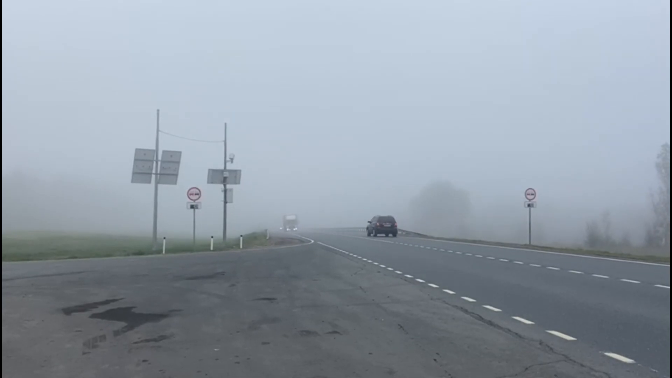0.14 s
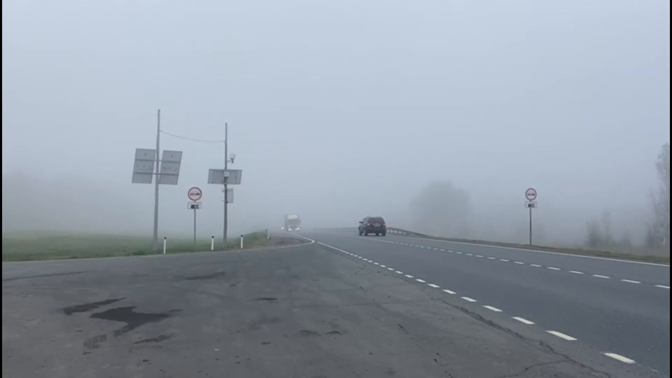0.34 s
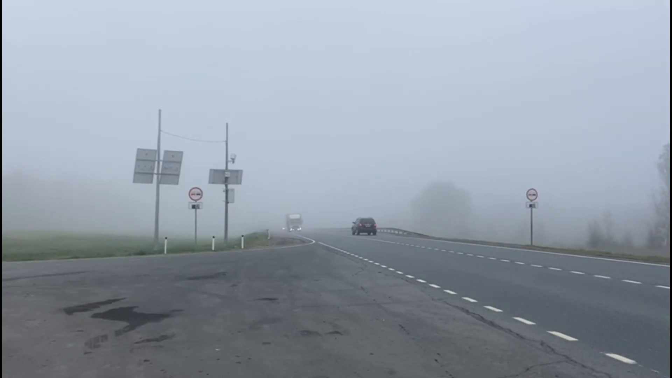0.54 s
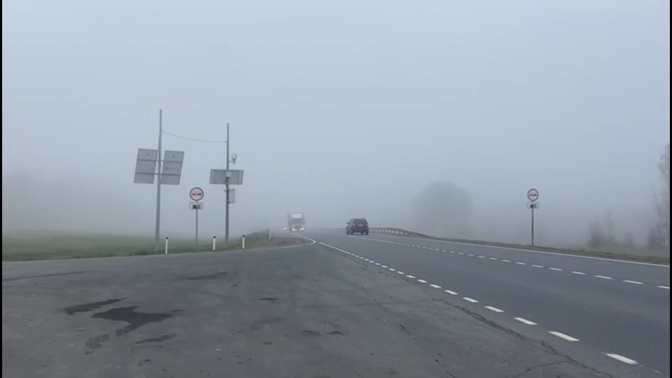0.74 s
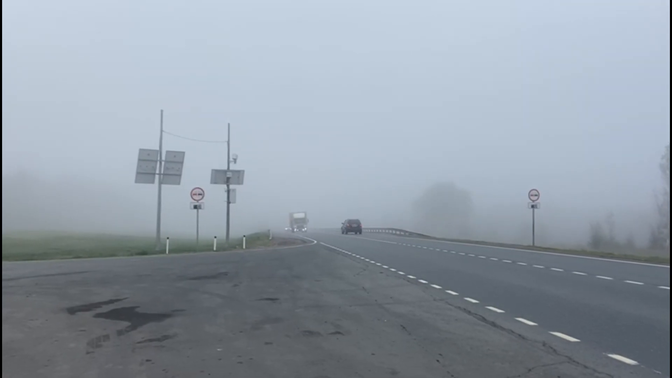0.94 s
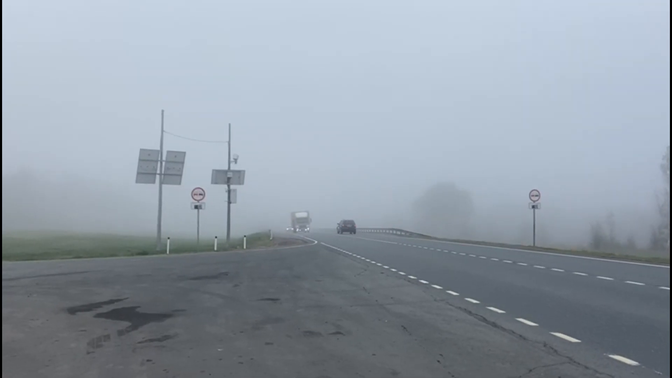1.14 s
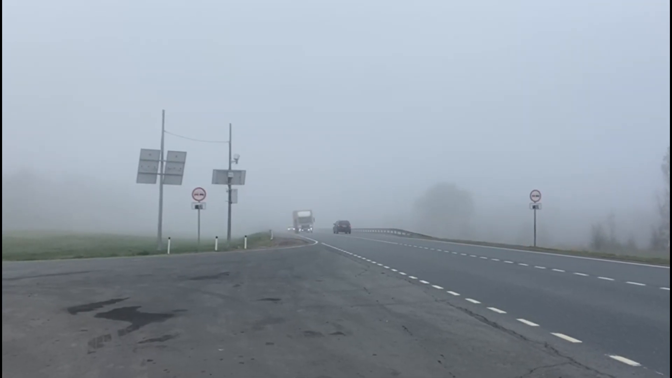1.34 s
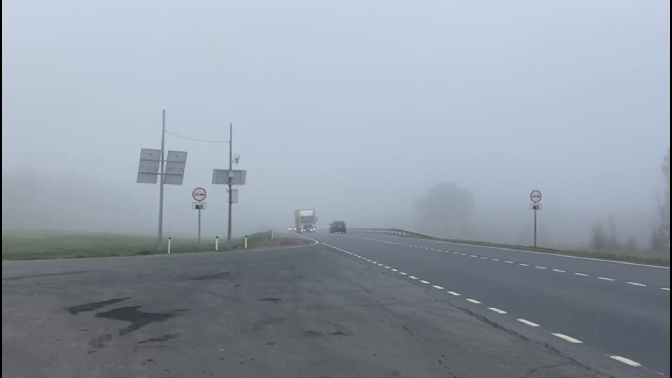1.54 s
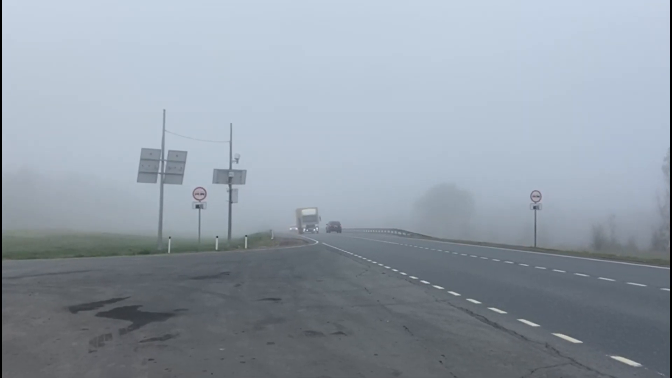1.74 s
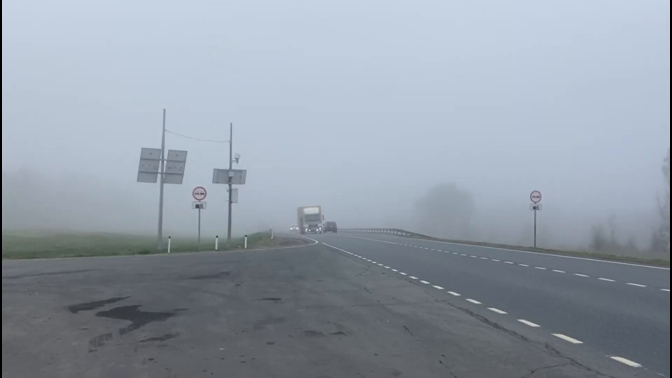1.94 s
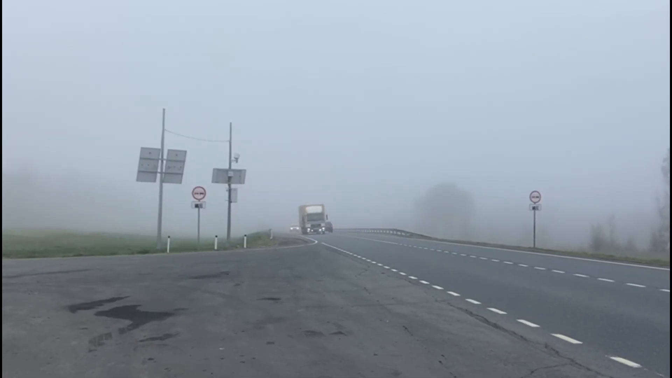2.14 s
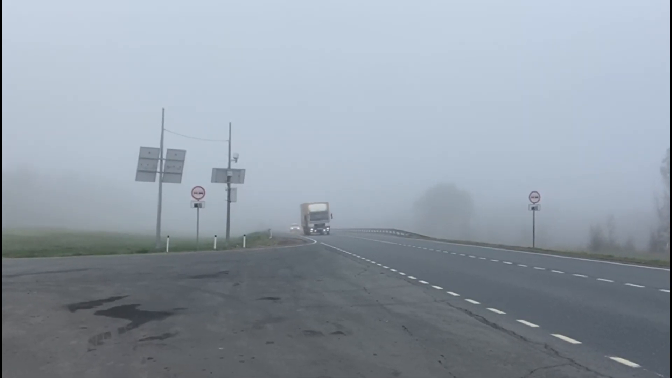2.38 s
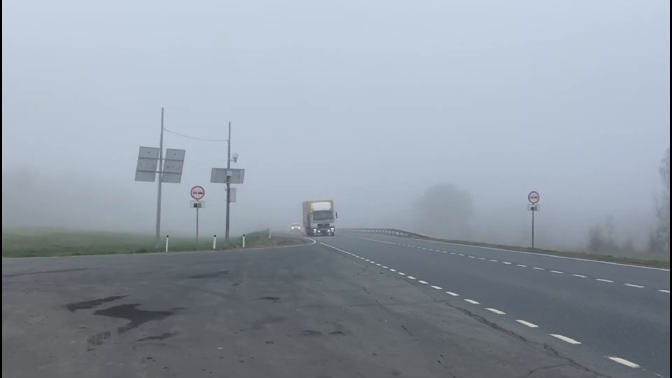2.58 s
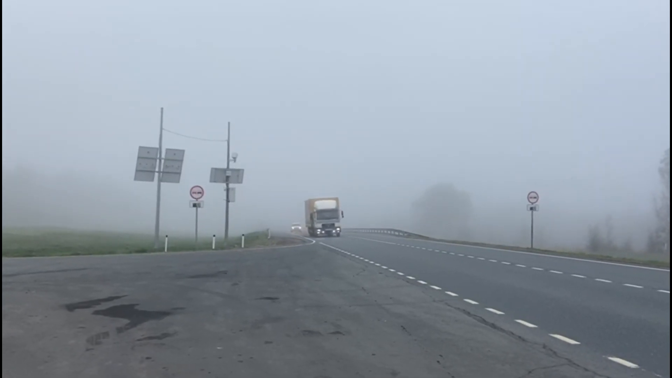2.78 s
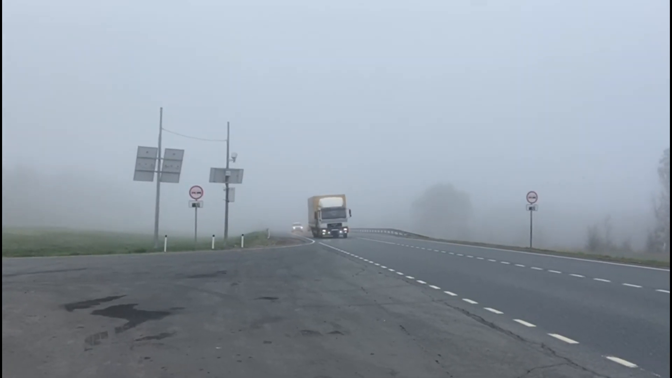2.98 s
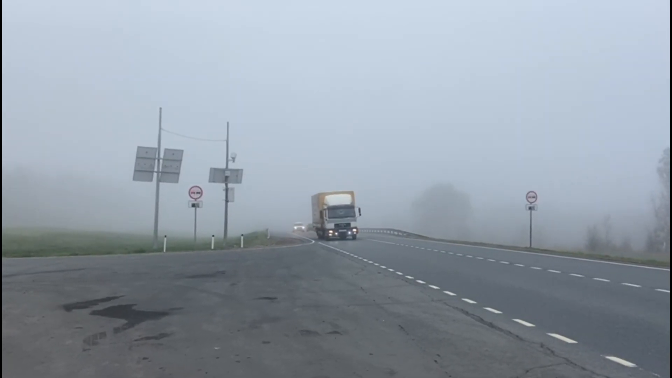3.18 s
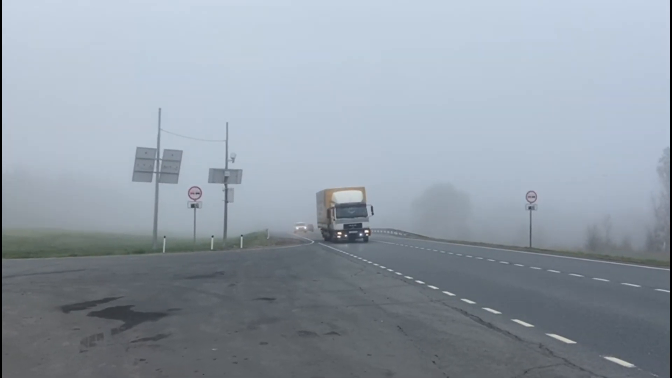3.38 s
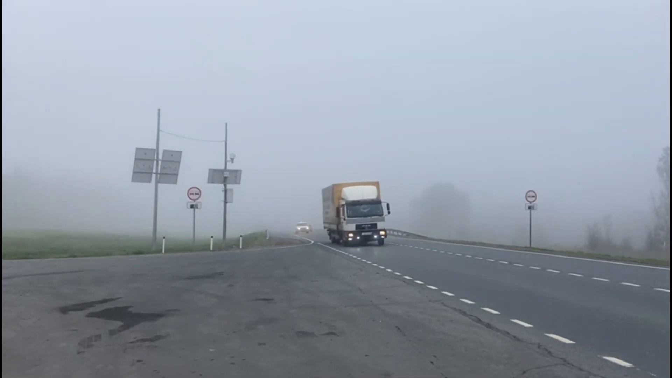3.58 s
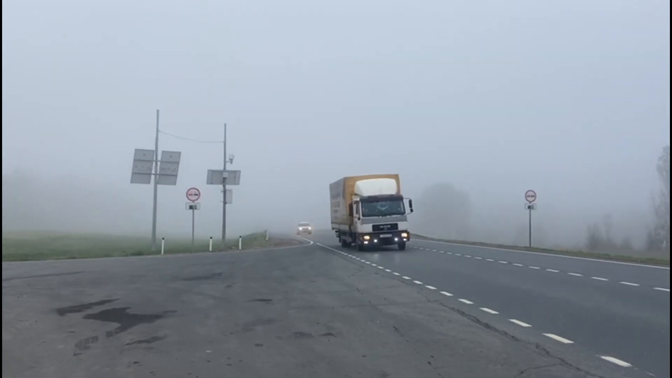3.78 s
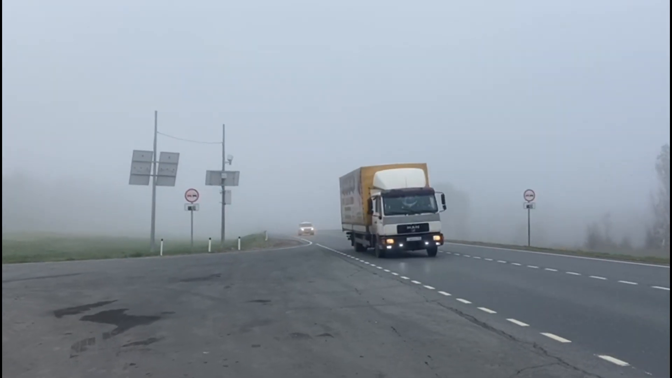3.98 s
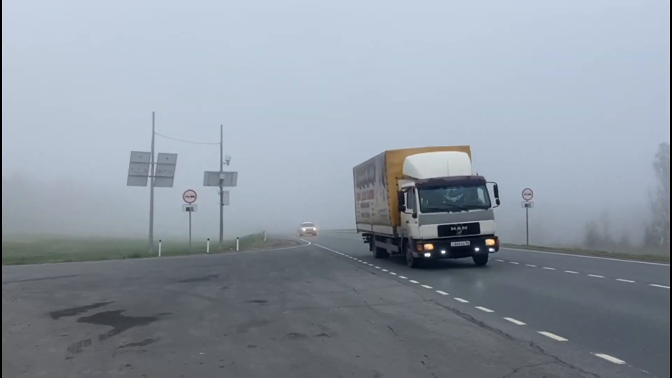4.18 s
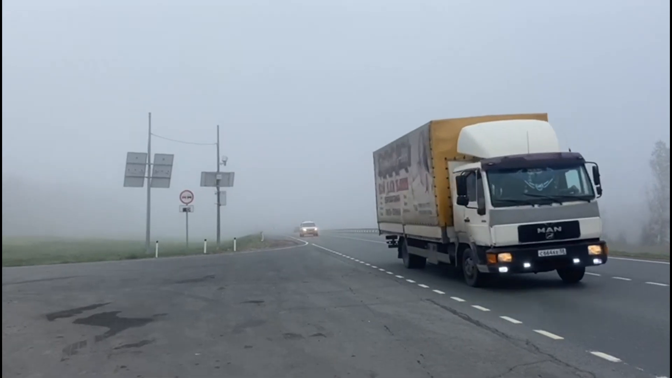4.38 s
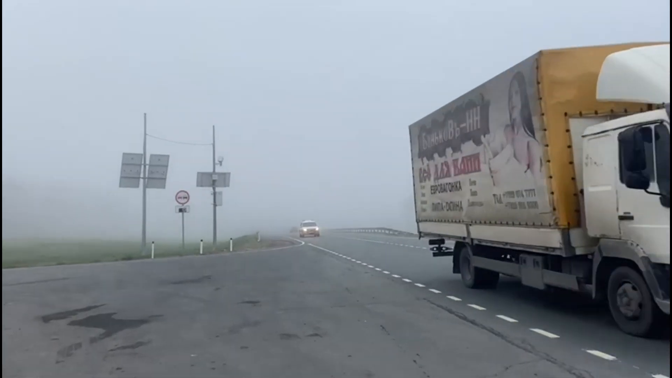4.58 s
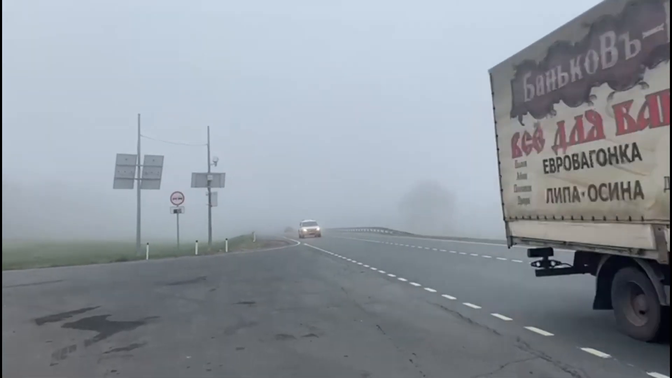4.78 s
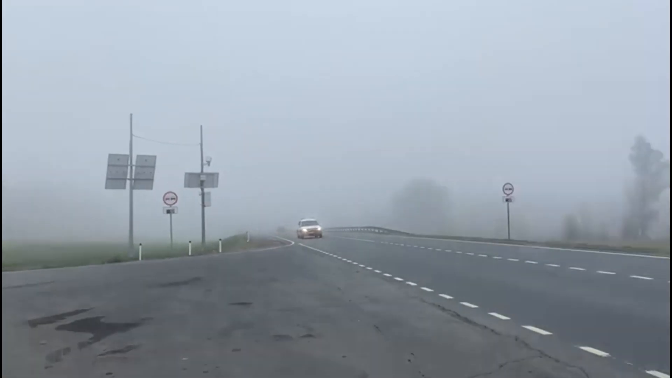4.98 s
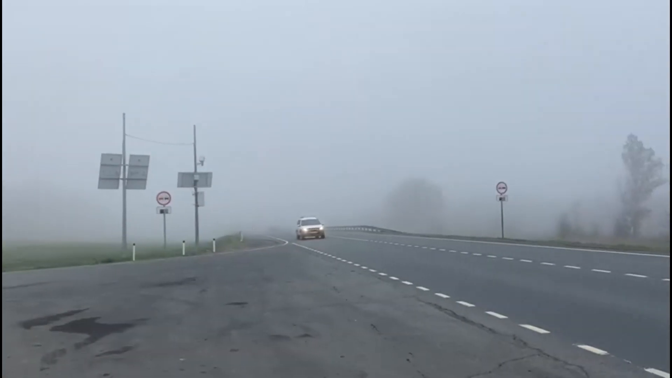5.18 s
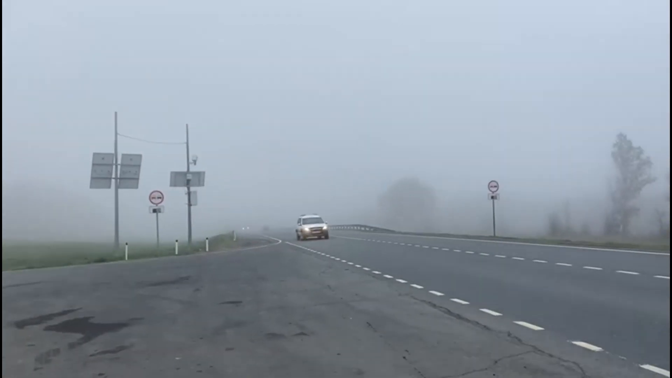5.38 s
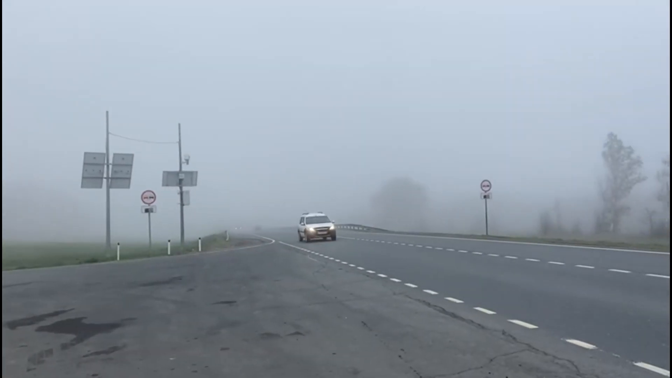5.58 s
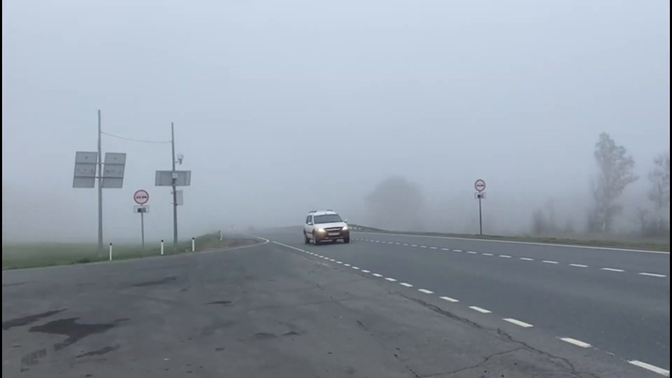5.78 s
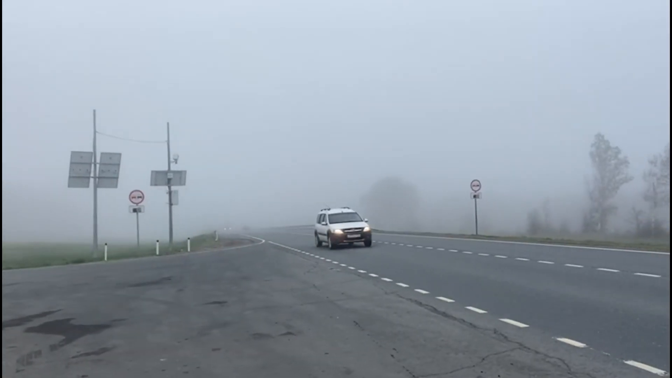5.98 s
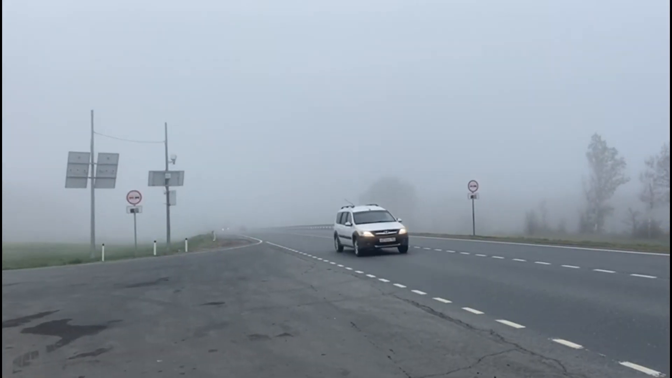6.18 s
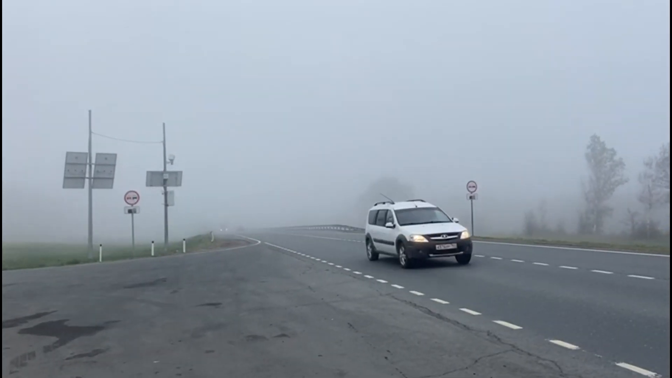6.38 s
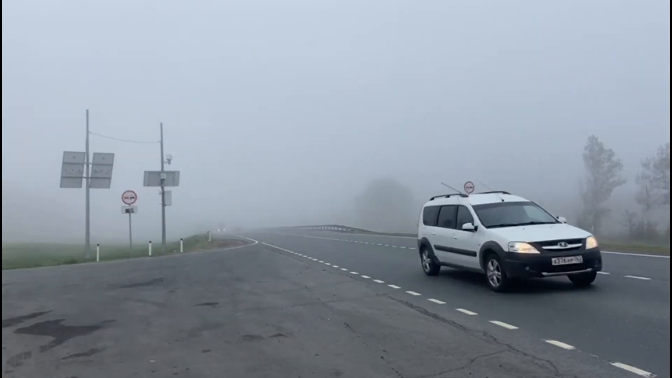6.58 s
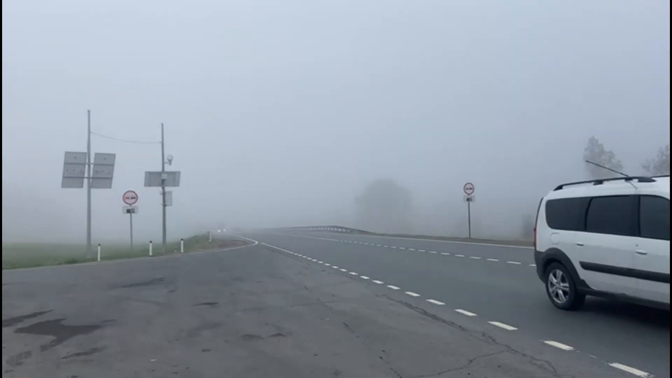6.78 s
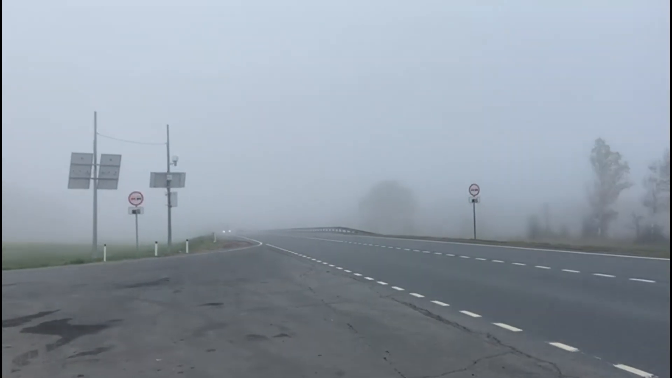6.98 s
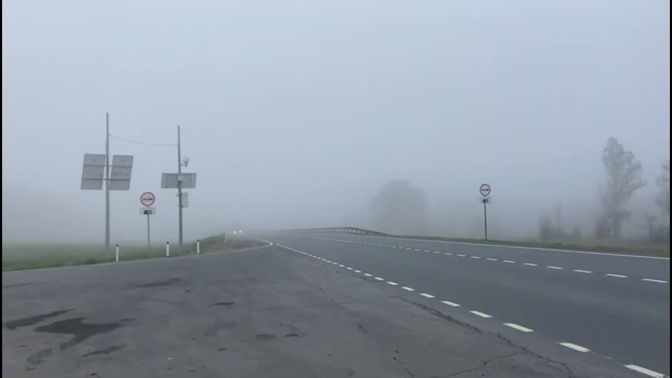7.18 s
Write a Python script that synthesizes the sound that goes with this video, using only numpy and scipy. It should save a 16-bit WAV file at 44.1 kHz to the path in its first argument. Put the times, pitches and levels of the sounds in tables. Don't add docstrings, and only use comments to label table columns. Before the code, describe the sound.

Close to a country highway outdoors, the tyre hiss of a departing car dwindles. A diesel truck approaches from ahead, its roar and low rumble swelling to a loud rush as it passes, exhaust humming on a deep falling note. The noise drops, then a second car swells and whooshes by. Small gusts thump softly on the handheld stereo phone microphones.

```python
import sys
import numpy as np
from scipy import signal
from scipy.fft import rfft, irfft
from scipy.io import wavfile
from scipy.ndimage import uniform_filter1d

SR = 44100
rng = np.random.default_rng(int(sys.argv[2]) if len(sys.argv) > 2 else 0)


def how_loud(loudness_db):
    steps = np.asarray(loudness_db, float) / 20
    return 10 ** steps


def pcm_store(signal):
    levels = np.round(np.clip(np.atleast_2d(signal), -1, 1) * 32767)
    wavfile.write(sys.argv[1], SR, levels.astype(np.int16).T)


N = 318843
FRAME = 1024
SPEED_M_S, LANE_M = 22.22, 5.44
ABREAST_S, PAST_S, TURN_S = -.2, 0.16, 0.038
CAR_FROM_S = 5.3
FAR_ROAD_DB = (-47.5, -42, -63, -64.5, -42.5, -37)


def curve(table, t):
    s, value = np.transpose(table)
    return np.interp(t, s, value)


def walk(rate, shape):
    size = max(int(4 * SR / FRAME / rate), 1)
    drift = uniform_filter1d(uniform_filter1d(rng.standard_normal(shape), size), size)
    return drift / drift.std()


def frames(x):
    hz, t, z = signal.stft(x, SR, nperseg=FRAME, noverlap=3 * FRAME // 4)
    return hz[:, None], t, z


def sound(z):
    return signal.istft(z, SR, nperseg=FRAME, noverlap=3 * FRAME // 4)[1][..., :N]


def total_db(db):
    return 10 * np.log10(np.sum(how_loud(db) ** 2, axis=0))


def bump(since, centre_s, width_s):
    return np.exp(-((since - centre_s) / width_s) ** 2)


# passes_s, length_m, boom_db and upper_boom_db when beside us
VEHICLES = [
    (-1.36, 4, -33, -30.5),
    (4.76, 11.5, -21.5, -20.5),
    (7, 2.6, -33, -27.5),
]


def places(t):
    passes, length = np.transpose(VEHICLES)[:2, :, None]
    since = t - passes
    along = np.abs(SPEED_M_S * since)
    axle_along = np.maximum(along - length / 2, 0)

    def turn(s):
        return .5 + .5 * np.tanh((since - s) / TURN_S / 2)

    middle = LANE_M / np.hypot(along, LANE_M)
    axle = LANE_M / np.hypot(axle_along, LANE_M)
    return since, middle, axle, turn(ABREAST_S), turn(PAST_S)


# howl_db, rasp_db, hiss_db
TREADS = [
    (6.5, -11, -18),
    (-3.5, -2.5, -21),
    (-8.5, -5.5, -25),
]
# time_s, level_db
LEAVING_ROAR = [
    (0, -41.5),
    (.6, -45),
    (1.2, -44),
    (2.2, -48.5),
]
# time_s, level_db
TRUCK_ROAR = [(1.3, -50.5), (1.9, -36), (3.3, -29.5), (4.3, -20), (4.97, -19), (5.08, -25), (5.36, -25),
              (5.57, -31.5), (5.78, -34)]
# time_s, level_db
CAR_ROAR = [(5.52, -49), (5.68, -33), (5.85, -28.5), (6.2, -26), (6.6, -23.5), (6.92, -22.5), (7.02, -26.5),
            (7.23, -29.5)]


def traffic(t):
    near_db = (14.6, 7.7, 1.55)
    gone_db = (0.4, -11, 0.6)
    since, _, close, _, past = places(t)
    length, low, upper = np.transpose(VEHICLES)[1:, :, None]
    since = since - length / 2 / SPEED_M_S
    roar = np.array([curve(level, t) for level in (LEAVING_ROAR, TRUCK_ROAR, CAR_ROAR)])
    tail = bump(since, 0.14, 0.2)
    body = bump(since, -0.047, 0.27)
    howl, rasp, hiss = [roar + np.array(db)[:, None] + near * tail + gone * past
                        for db, near, gone in zip(zip(*TREADS), near_db, gone_db)]
    rasp = rasp + 1 * bump(since, 0.29, 0.2)
    hiss = hiss + 6 * close + 3.5 * body
    fall_db = 13.5 * np.log10(close)
    boom_db = low + fall_db - 6 * past
    upper_db = upper + fall_db + 5.5 * body - 8 * past
    return [roar, howl, rasp, hiss, boom_db, upper_db]


def heard(t):
    return [total_db(np.vstack([db, far + 0 * t])) for db, far in zip(traffic(t), FAR_ROAD_DB)]


def bearing(t):
    stray = 0.04
    since, close, _, abreast, past = places(t)
    power = how_loud(traffic(t)[0]) ** 2
    far = np.maximum(1 / close - 1.3, 0) * (1 - past)
    scatter = stray + .021 * far + 0.83 * bump(since, 0.22, 0.26)
    shares = np.array([1 - abreast, abreast - past + stray, past + .018 * far, scatter])
    ways = (shares * power).sum(axis=1)
    ways[3] += how_loud(FAR_ROAD_DB[0]) ** 2
    coming = np.where(t < CAR_FROM_S, close[1], close[2])
    going = np.where(since[2] < ABREAST_S, close[1], close[2])
    ahead_stretch = .955 + .23 * coming ** .75
    behind_stretch = np.where(since[1] < ABREAST_S, 1.0, np.maximum(.27 + 1.5 * going, .77))
    return [ahead_stretch, behind_stretch, *(ways / ways.sum(axis=0))]


# pitch_hz, lead_turns
AHEAD_TRUCK = [(400, 0), (750, .08), (1000, .05), (1300, .2), (1600, .5), (1850, .93), (2250, 1.03),
               (2650, 1.5), (2900, 2.0), (3270, 2.44), (3430, 2.56), (3750, 3.0), (4050, 3.03), (4300, 3.5),
               (4650, 4.0), (4930, 4.44), (5100, 4.55), (5480, 5.0), (5750, 5.5), (6100, 6.0)]
# pitch_hz, lead_turns
AHEAD_CAR = [(400, 0), (750, .1), (1050, .02), (1450, .22), (1680, .45), (1830, .55), (2000, .9),
             (2300, 1.02), (2850, 1.45), (3000, 1.55), (3200, 2.0), (3750, 2.32), (4050, 2.0), (4300, 2.02),
             (4520, 2.5), (4750, 3.0), (5100, 3.0), (5400, 3.3), (5800, 3.0)]
# pitch_hz, lead_turns
BEHIND = [(0, 0), (200, -.07), (450, -.27), (750, -.47), (1350, -.55), (1700, -.75), (2600, -.88),
          (3300, -1.05), (3900, -1.46), (4400, -1.55), (5100, -2.0), (5900, -2.03), (6500, -2.35)]


def arrive(z, hz, t):
    ahead_stretch, behind_stretch, *power = bearing(t)
    power = [np.abs(p) + 0 * hz for p in power]
    power[2] = power[2] * np.clip(1000 / (hz + 1), .55, 2.5) ** 1.5
    power[3] = power[3] * np.clip(hz / 400, .15, 1) * (1 + (hz / 6000) ** 2)
    share = np.sqrt(power / sum(power))
    truck, car = (np.interp(hz / ahead_stretch, *np.transpose(comb)) for comb in (AHEAD_TRUCK, AHEAD_CAR))
    turns = np.where(t < CAR_FROM_S, truck, car)
    share[0] *= 1 + 0.061 * np.cos(2 * np.pi * turns)
    ahead = np.exp(1j * np.pi * turns) * how_loud(0.54)
    shade_db = -0.5 - 1.96 * np.exp(-(np.log(hz / 1300 + 1e-9) / 0.79) ** 2)
    lag = np.interp(hz / behind_stretch, *np.transpose(BEHIND))
    behind = np.exp(1j * np.pi * lag) * how_loud(shade_db)
    front, beside, rear = share[0] * z[0], share[1] * z[1], share[2] * z[2]
    left = front * ahead + rear * behind + beside + share[3] * z[3]
    right = front / ahead + rear / behind + beside + share[3] * z[4]
    return np.array([left, right])


def coloured(spectrum, move_db, swell_db, flicker_db, patch_hz):
    hz, t, z = frames(rng.standard_normal((5, N)))
    at, db = np.transpose(spectrum)
    rest = how_loud(np.interp(np.log(hz + 1), np.log(at), db, left=-120, right=-120))
    rest = rest / np.sqrt(np.mean(rest ** 2))
    patch_bands = max(int(patch_hz / hz[1, 0]), 1)
    patches = uniform_filter1d(walk(11.4, z[0].shape), size=patch_bands, axis=0)
    drift = swell_db * walk(6.5, len(t)) + flicker_db * patches / patches.std()
    return sound(arrive(z, hz, t) * rest * how_loud(move_db(hz, t) + drift))


# pitch_hz, level_db (per Hz)
TYRE = [(250, -22), (400, -7), (600, -6), (850, -3), (1150, 2.5), (1500, -2), (2200, -6.5), (3200, -11.5),
        (5000, -19.5), (6500, -21.5), (7800, -26.5), (9200, -22), (11000, -28.5), (11900, -33)]
# pitch_hz, level_db
PARTS = [
    (570, -0.5),
    (1120, 2.5),
    (2250, -1.5),
    (5000, -11.5),
    (9000, -11.5),
]


def tyres():
    def move_db(hz, t):
        roar, howl, rasp, hiss = heard(t)[:4]
        at, near_db = np.transpose(PARTS)
        change = np.array([howl - roar, 0 * t, rasp - roar, hiss - roar, hiss - roar]) - near_db[:, None]
        change[-1] = 1.52 * change[-1] + 0.31 * (roar + 22) - 7.9 * bearing(t)[4]
        weight = [np.interp(np.log(hz + 1), np.log(at), row) for row in np.eye(len(at))]
        return roar + sum(w * c for w, c in zip(weight, change))
    return how_loud(4.5) * coloured(TYRE, move_db, swell_db=.8, flicker_db=1.4, patch_hz=400)


# middle_s, half_length_s, thud_db, buffeting_db
GUSTS = [(.02, 0.12, -33, -23.5), (0.292, .2, -29, -29), (1.105, 0.17, -54.5, -29.5),
         (1.445, 0.089, -37, -25), (1.76, .2, -37.5, -30.5), (2.35, 0.49, -44, -29),
         (2.892, 0.23, -40, -26.5), (3.4, 0.32, -34.5, -29.5), (4.146, 0.48, -32, -30.5),
         (4.62, 0.17, -28, -33), (5.036, .15, -22.5, -21.5), (5.45, 0.15, -29, -32), (5.95, 0.25, -39, -40),
         (6.6, .4, -42, -37), (7.0, .22, -41, -30)]


def gusts(t):
    s, half, thud, buffet = np.transpose(GUSTS)[:, :, None]
    shape_db = -np.minimum(6.0 * ((t - s) / half) ** 4, 90)
    calm_db = -65.5 + 0 * t
    return total_db(np.vstack([thud + shape_db, calm_db])), total_db(buffet + shape_db)


# pitch_hz, level_db (per Hz)
BOOM = [(45, -22), (62, -6), (85, -1), (115, 3.5), (150, -4.5), (185, -0.5), (260, -3), (300, -2.5),
        (370, -12.5), (480, -25), (700, -30.5)]


def boom():
    def move_db(hz, t):
        low, upper = heard(t)[4:]
        buffet = gusts(t)[1]
        low, upper = total_db([low, buffet]), total_db([upper, buffet - 11])
        blend = np.clip(np.log(hz / 150 + 1e-9) / np.log(1.7), 0, 1)
        return low + blend * (upper - low + .5)
    lean = how_loud(np.array([[-.7], [.7]]))
    return how_loud(3.0) * coloured(BOOM, move_db, swell_db=0.9, flicker_db=1.65, patch_hz=120) * lean


# pitch_hz, level_db (per Hz)
WIND = [(18, -37.5), (30, -23), (42, -9), (60, -6.5), (90, -9), (140, -15.5), (220, -30.5)]


def wind():
    t = np.arange(0, N, 64) / SR
    gust = np.interp(np.arange(N) / SR, t, gusts(t)[0])
    hz = np.fft.rfftfreq(N, 1 / SR)
    at, db = np.transpose(WIND)
    colour = how_loud(np.interp(np.log(hz + 1), np.log(at), db, right=-120))
    mid, side = irfft(rfft(rng.standard_normal((2, N))) * colour, N)
    both = mid + how_loud(-17) * side * np.array([[1], [-1]])
    return how_loud(gust + 2.5) * both / mid.std()


# time_s, level_db
EXHAUST = [(.9, -46), (1.5, -30.5), (2.2, -38), (3.4, -28), (4.75, -19.5), (4.9, -11.5), (5.0, -14.5),
           (5.13, -13.5), (5.22, -22), (5.36, -17), (5.78, -24.5), (6.17, -21.5), (6.38, -28.5),
           (6.6, -21.5), (6.8, -31), (7.12, -16.5), (7.23, -25)]
# multiple, level_db
HARMONICS = [
    (1, -1),
    (2, -19.5),
    (3, -18.5),
    (4, -32),
]


def exhaust():
    firing_hz, speed_m_s, passes_s, pipe_m = 81.4, 23.5, 4.99, 4
    t = np.arange(N) / SR
    along = speed_m_s * (t - passes_s)
    hz = firing_hz * (1 - speed_m_s / 343 * along / np.hypot(along, pipe_m))
    grid = np.linspace(0, N / SR, 4 * N // FRAME)
    waver, throb = (np.interp(t, grid, walk(rate, len(grid))) for rate in (6.0, 14.0))
    phase = 2 * np.pi * np.cumsum(hz * (1 + 0.00411 * waver)) / SR
    note = sum(how_loud(h_db) * np.sin(k * phase + k * k) for k, h_db in HARMONICS)
    fade_in = np.clip((t - .6) / 0.62, 0, 1)
    return np.sqrt(2) * note * how_loud(curve(EXHAUST, t) + 0.63 * throb) * fade_in


def scene():
    return tyres() + boom() + exhaust() * how_loud(np.array([[-.5], [.5]])) + wind()


def blocks(v):
    rows, cols = (np.arange(size) // 4 * 4 + 2 for size in v.shape)
    power = uniform_filter1d(uniform_filter1d(abs(v) ** 2, size=4, axis=0), size=4)
    tiles = np.ix_(rows.clip(max=v.shape[0] - 1), cols.clip(max=v.shape[1] - 1))
    return 10 * np.log10(power[tiles] + 1e-20)


def low_pass(x):
    return signal.sosfilt(signal.butter(12, 12740, fs=SR, output="sos"), x)


def record(dry):
    joined_hz, flip_low_hz, flip_high_hz, top_hz = 6250, 8150, 10100, 11750
    hz, t, (left, right) = frames(dry)
    flutter = walk(30, (len(hz), len(t)))[::12].repeat(12, axis=0)[:len(hz)]
    edge = hz + 110 * flutter
    turned = (edge > flip_low_hz) & (edge < flip_high_hz)
    mid, side = (left + right) / 2, (left - right) / 2
    lead_db = blocks(mid) - blocks(side)
    gap_db = np.interp(hz, [500, 2000, 6000], [12, 6.5, 4.5])
    mid = mid * ~((hz > 500) & (lead_db < -gap_db))
    side = side * ~((hz > 1900) & (lead_db > gap_db))
    joined = edge > joined_hz
    left = left * (abs(left) > how_loud(-96))
    mid = np.where(joined, left * ~turned, mid)
    side = np.where(joined, left * turned, side)
    wet = sound(np.array([mid + side, mid - side]) * (edge < top_hz))
    mix = np.tanh(.5 * wet) / .5
    return low_pass(mix)


dry = scene()
out = record(dry)
pcm_store(out)
```